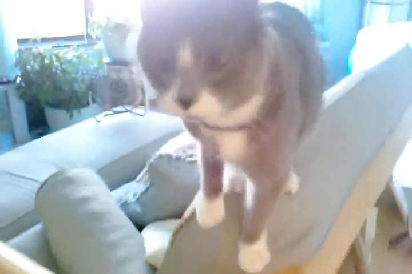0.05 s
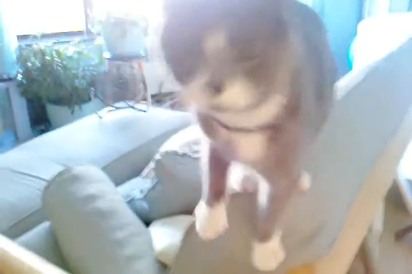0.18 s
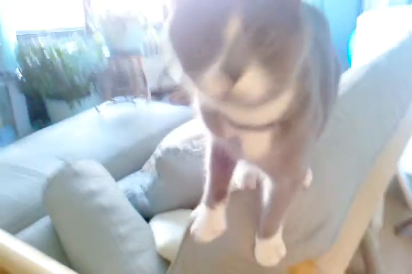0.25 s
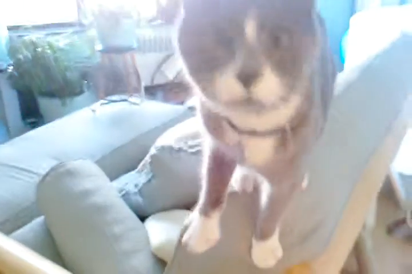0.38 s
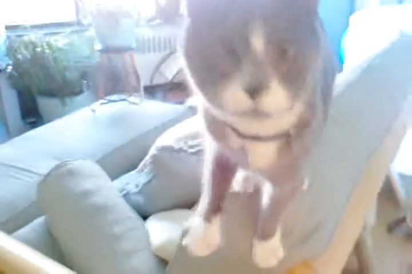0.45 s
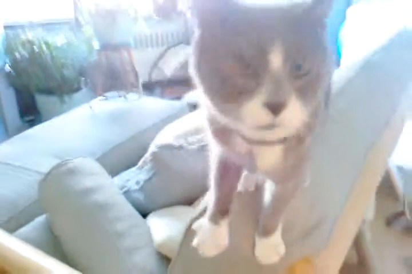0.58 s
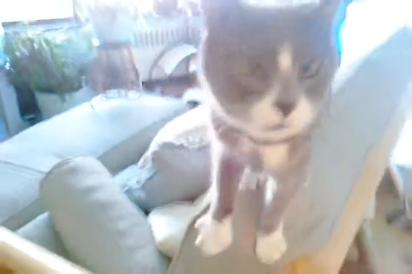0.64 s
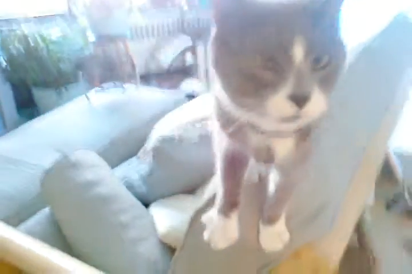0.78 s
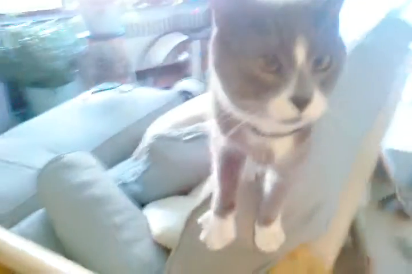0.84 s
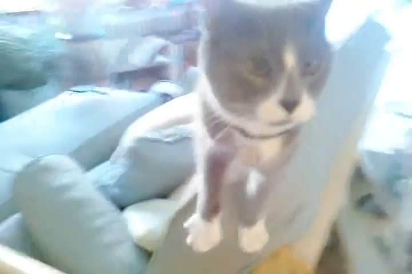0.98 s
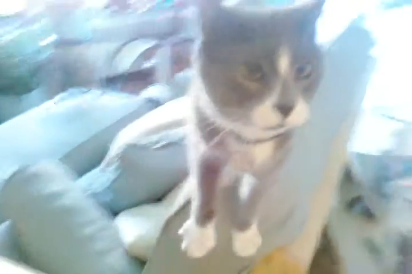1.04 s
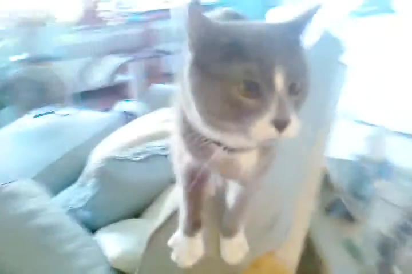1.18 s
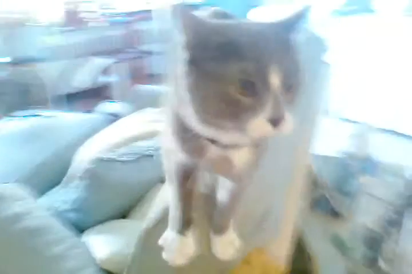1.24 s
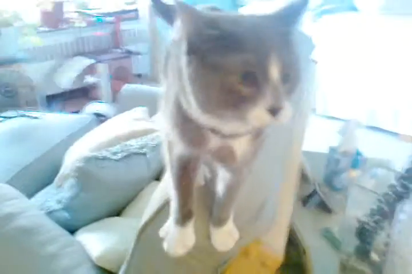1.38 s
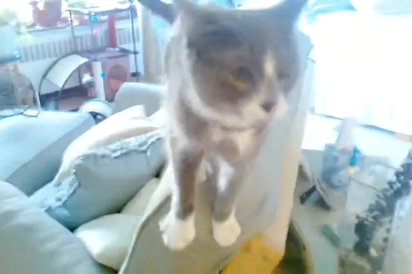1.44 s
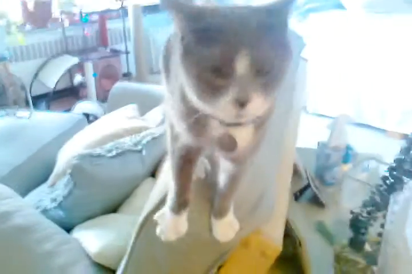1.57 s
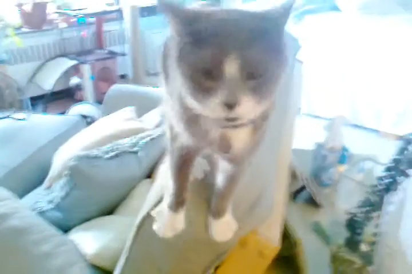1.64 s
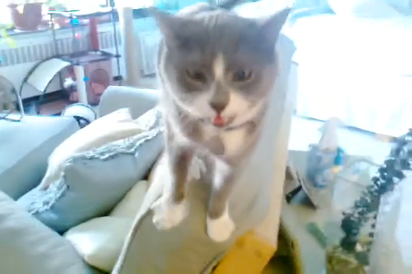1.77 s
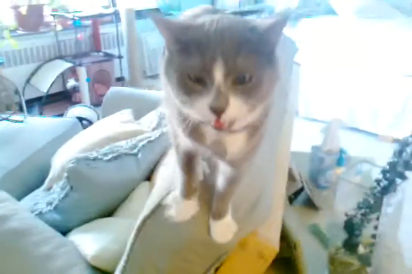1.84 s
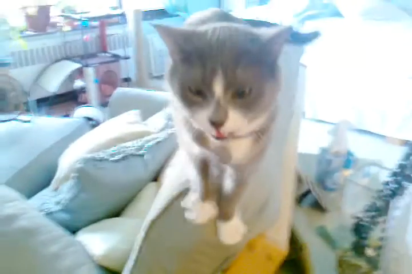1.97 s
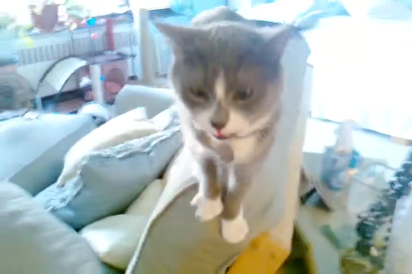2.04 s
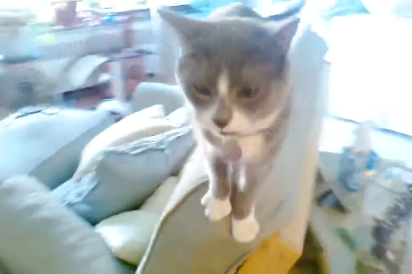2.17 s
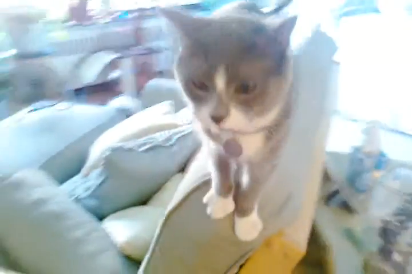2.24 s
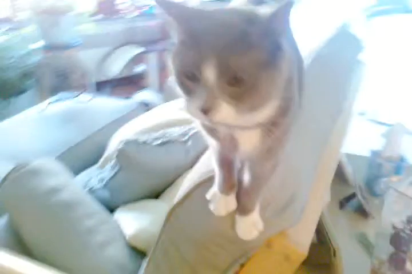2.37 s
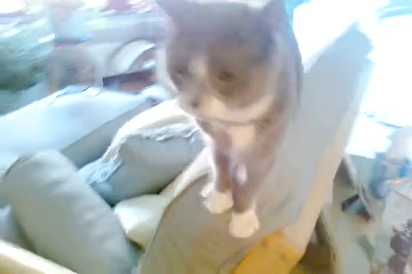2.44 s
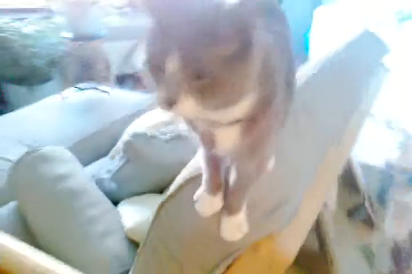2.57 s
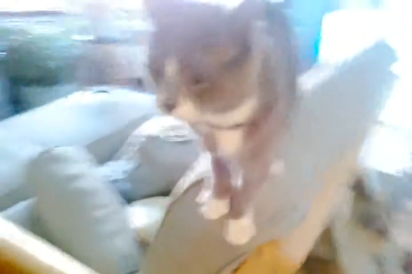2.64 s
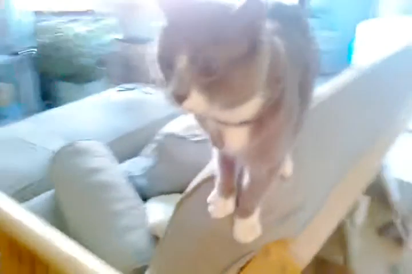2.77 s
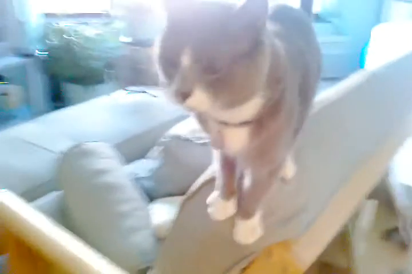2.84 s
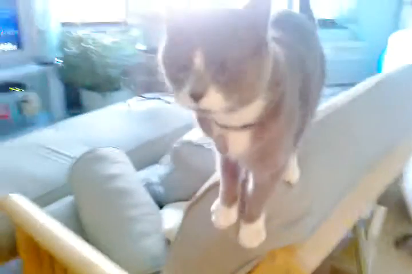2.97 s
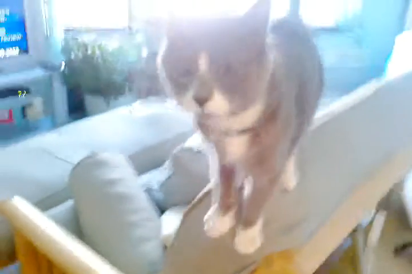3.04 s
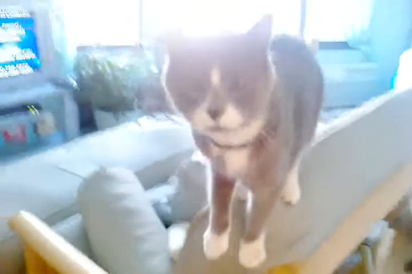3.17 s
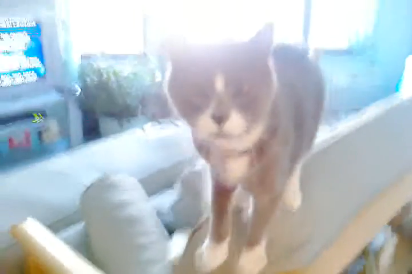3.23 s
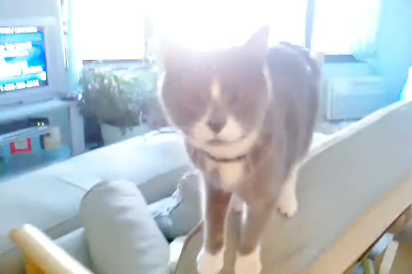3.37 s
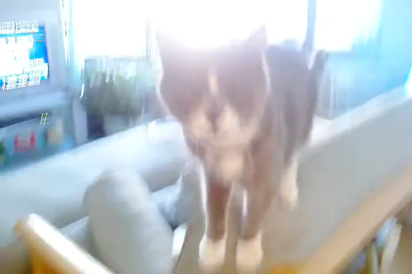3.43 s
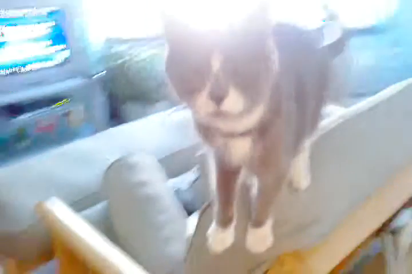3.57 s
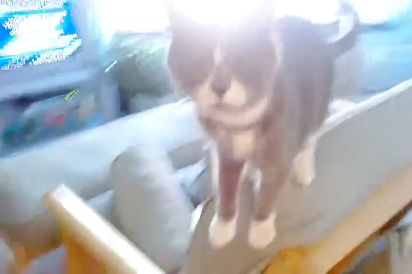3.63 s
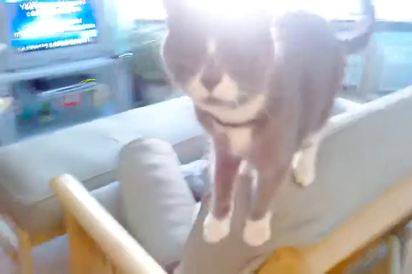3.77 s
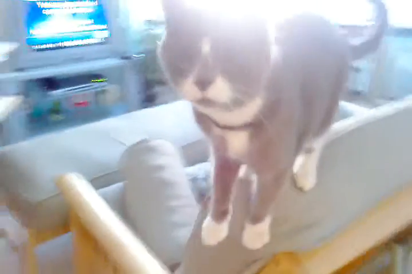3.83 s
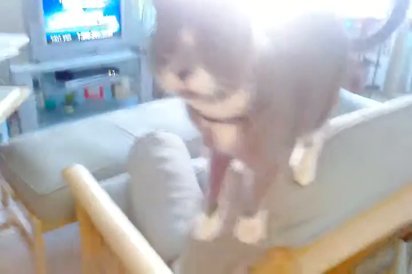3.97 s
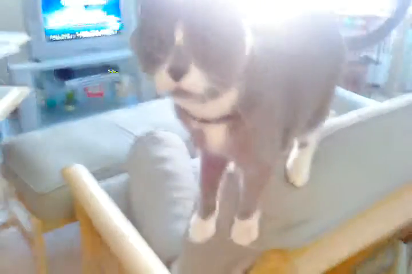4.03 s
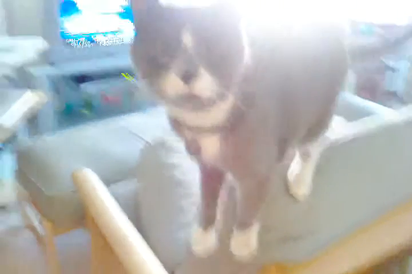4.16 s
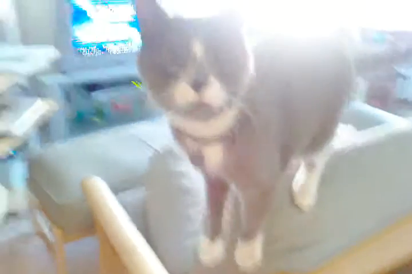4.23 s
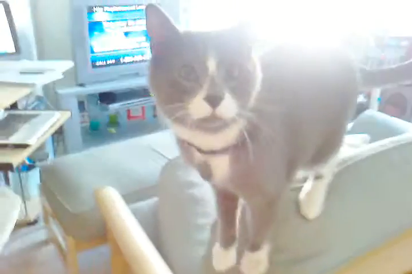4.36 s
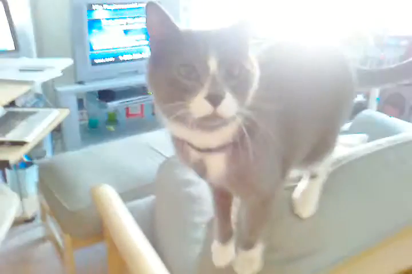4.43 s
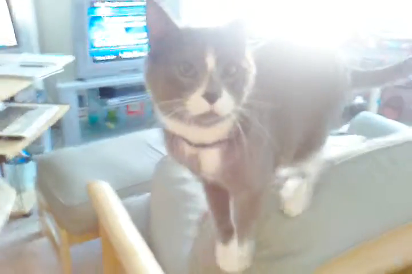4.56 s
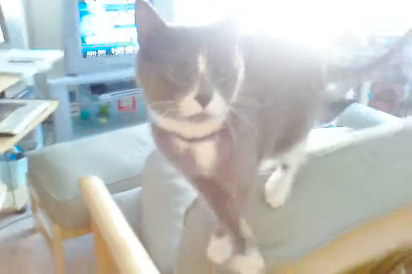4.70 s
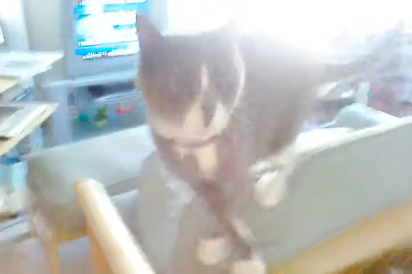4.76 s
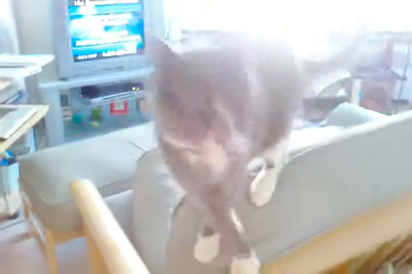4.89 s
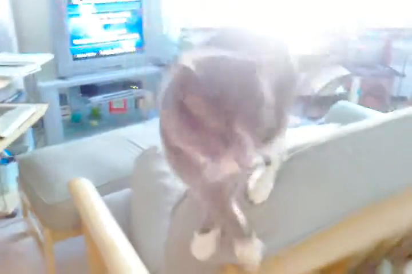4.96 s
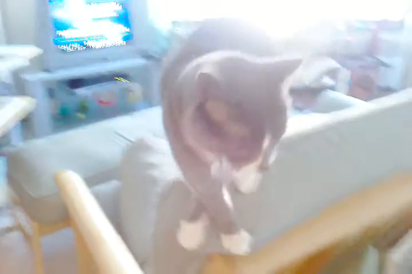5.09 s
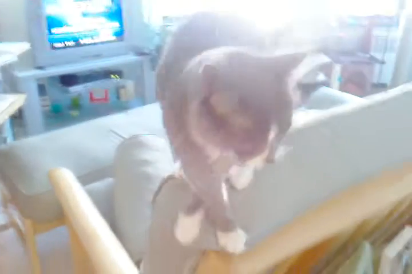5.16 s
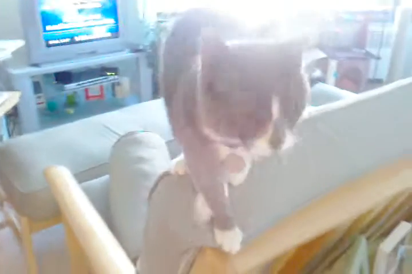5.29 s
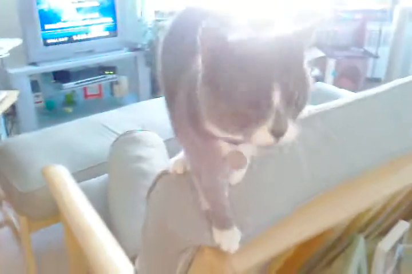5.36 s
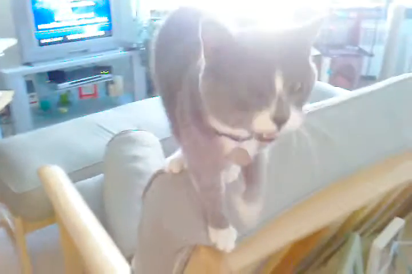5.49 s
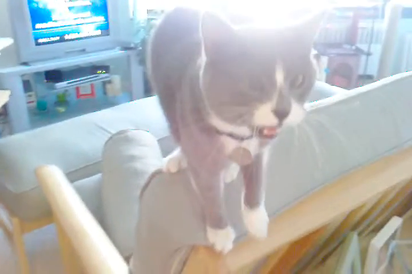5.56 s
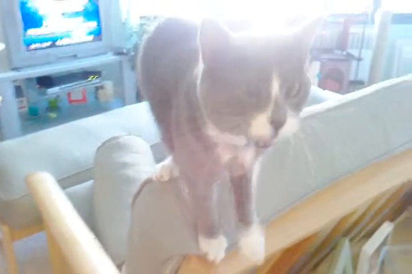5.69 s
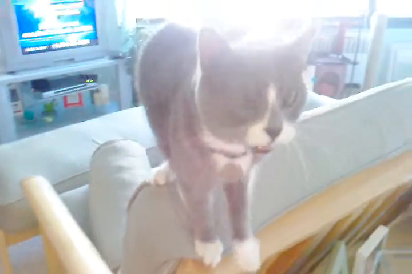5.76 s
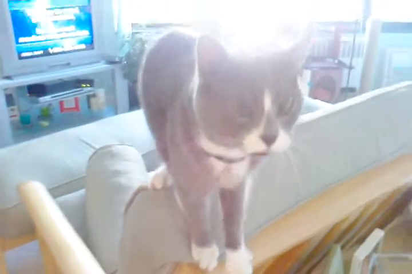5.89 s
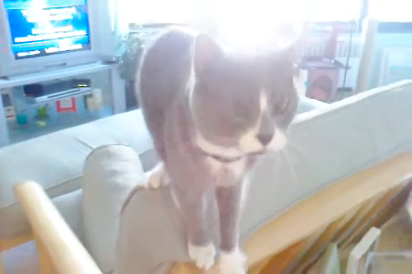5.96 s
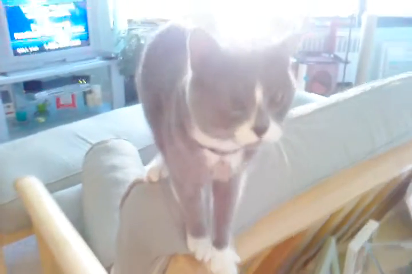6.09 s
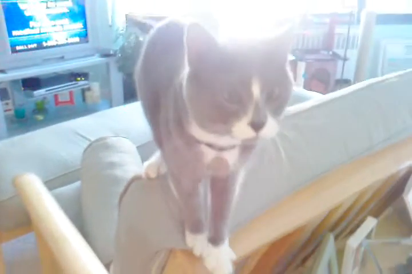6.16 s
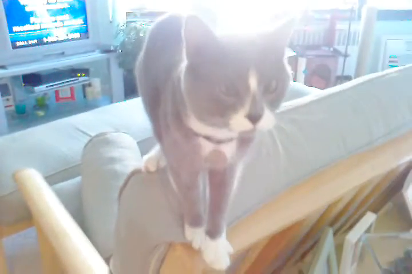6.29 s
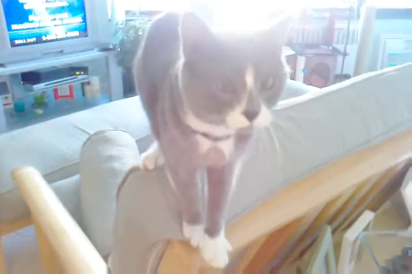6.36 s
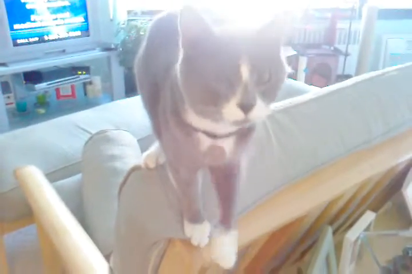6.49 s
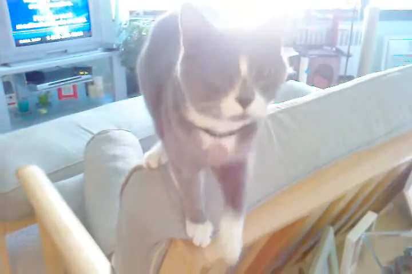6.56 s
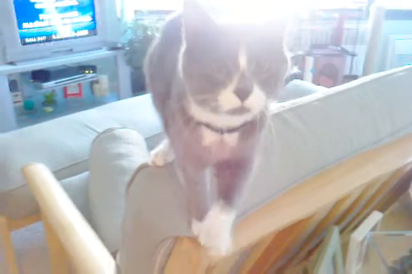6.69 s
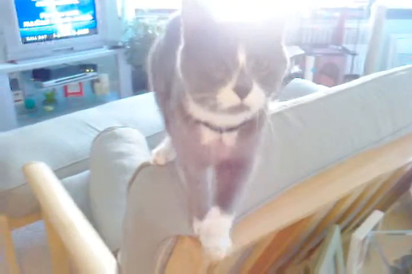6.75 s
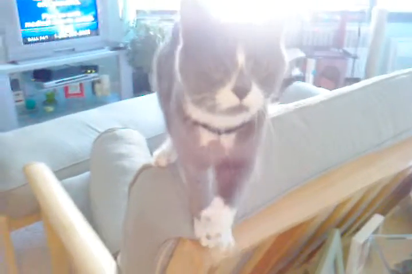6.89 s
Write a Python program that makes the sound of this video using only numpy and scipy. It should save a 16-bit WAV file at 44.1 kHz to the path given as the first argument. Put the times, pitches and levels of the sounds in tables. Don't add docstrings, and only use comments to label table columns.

```python
import sys
import numpy as np
from scipy import signal
from scipy.fft import rfft, irfft, next_fast_len
from scipy.io import wavfile
from scipy.ndimage import uniform_filter1d

SR = 44100
rng = np.random.default_rng(int(sys.argv[2]) if len(sys.argv) > 2 else 0)


def digitize_waveform(pressure):
    field = np.atleast_2d(pressure).T
    bounded = np.clip(field, -1, 1)
    quanta = np.round(bounded * 32767).astype(np.int16)
    wavfile.write(sys.argv[1], SR, quanta)


def ratio_of_db(decibels):
    return 10 ** (np.asarray(decibels, float) / 20)


N = 305172

# width_hz, level_db
MOUTH = [(1050, -4), (1370, -1.5), (900, -9)]
CAT_LAG_S = .00005


def meow(call, top_db, turn_db):
    span = slice(int(SHAPING[call][0][0] * SR), int(SHAPING[call][-1][0] * SR))
    pitch, first_db, second_db, low_hz, low_db, high_hz, high_db, rough, gate = (
        curve[span] for curve in articulate(call))
    rough = np.clip(rough, 0, 1)
    jitter = .002 * drift(25)[span] + .12 * rough ** 2 * drift(150)[span]
    pitch = uniform_filter1d(pitch, size=500) * (1 + jitter)
    cycles = np.cumsum(pitch) / SR
    centres_hz = (low_hz, high_hz, 4930)
    levels_db = (low_db, high_db, high_db + top_db)
    ports = np.zeros((2, N))
    for k in range(1, 13):
        if k == 1:
            level = ratio_of_db(first_db - 4.5)
        elif k == 2:
            level = ratio_of_db(second_db - 5.0)
        else:
            level = sum(ratio_of_db(db + open_db) / (1 + (2 * (k * pitch - hz) / width_hz) ** 2) ** 2
                        for (width_hz, db), hz, open_db in zip(MOUTH, centres_hz, levels_db))
        shimmer = ratio_of_db((0.46 + 0.21 * k) * drift(21)[span]) * (1 + rough * drift(110)[span])
        for side, sign in enumerate((1, -1)):
            wander_db = .7 * min(k, 4) * drift(2)[span]
            uneven = ratio_of_db(wander_db - sign * turn_db * (k > 2))
            phase = 2 * np.pi * k * (cycles + sign * pitch * CAT_LAG_S / 2) + 0.36 * k * k
            ports[side, span] += gate * level * shimmer * uneven * np.sin(phase)
    return np.sqrt(2) * ports


# time_s, pitch_hz
PITCH = [
    [(1.587, 641.5), (1.657, 606), (1.75, 689.5), (1.8, 717.7), (1.85, 728), (1.966, 705.3), (2.03, 682),
     (2.16, 656.5), (2.275, 625)],
    [(5.332, 559), (5.368, 530), (5.46, 637.4), (5.55, 705.7), (5.8, 721), (5.854, 693.5), (5.925, 712.5),
     (5.94, 737), (6.04, 715.5)],
]
# time_s, effort_db, jaw_open (0-1), lips_spread (0-1), upper_resonance_hz (tongue)
SHAPING = [
    [(1.588, -40, 0.3, 0.3, 3830), (1.657, -46.5, 0.52, .27, 3600), (1.715, -42.5, 0.18, 0.81, 3050),
     (1.79, -38.5, 0.67, 0.71, 3620), (1.86, -35.5, 0.57, 0.66, 4000), (1.965, -40.5, 0.58, 0.64, 3630),
     (1.995, -42, 0.4, 0.55, 3270), (2.08, -44.5, 0, 0.62, 3150), (2.275, -38.5, .2, 0.03, 3320)],
    [(5.332, -38.5, 0.24, 0.37, 4330), (5.357, -44.5, 0.9, 0.67, 4200), (5.41, -43, 0.78, 0.42, 4080),
     (5.5, -40, 0.53, 0.69, 3270), (5.65, -36, 0.86, 0.54, 3570), (5.72, -39.5, 0.72, 0.42, 3600),
     (5.91, -40, 0.38, 0, 4200), (5.95, -36.5, 0.17, 0.1, 4200), (6.038, -40.5, 0, .3, 3480)],
]
END_HZ, END_JAW, END_DB, END_ROUGH = [-68, 45], [0.33, -0.33], [-4.5, 3.5], [.2, .01]
END_FIRST_DB, END_LEAD_S, END_S = [-10, 2], [0.0208, 0.012], [0.0143, .007]
SECOND_DB, ONSET_SHUT_DB, RELEASE_S = [-9, -7.5], [-22, -6.5], [.015, 0.018]
FIRM_DB = -38


def articulate(call):
    (pitch,), (effort_db, jaw, lips, high_hz) = in_time(PITCH[call]), in_time(SHAPING[call])
    start_s, end_s = SHAPING[call][0][0], SHAPING[call][-1][0]
    ending = swell(end_s - END_LEAD_S[call], END_S[call])
    pitch = pitch + 140.6 * swell(start_s, 0.0072) + END_HZ[call] * ending
    rough = .08 + .02 * (FIRM_DB - effort_db) + END_ROUGH[call] * ending + .13 * swell(start_s, .06)
    effort_db = effort_db + END_DB[call] * ending
    jaw = jaw + END_JAW[call] * ending
    first_db = effort_db - 11.5 * jaw + END_FIRST_DB[call] * ending
    second_db = effort_db + SECOND_DB[call] + 0.5 * jaw - 0.08 * (effort_db - FIRM_DB)
    mouth_db = effort_db + ONSET_SHUT_DB[call] * swell(start_s, 0.021)
    low_hz = 3.15 * pitch
    low_db = mouth_db - 15 + 21.5 * jaw
    high_db = mouth_db - 33.5 + 38 * lips
    gate = inside(start_s, end_s + 1, 0.0031) * inside(start_s - 1, end_s, RELEASE_S[call])
    return pitch, first_db, second_db, low_hz, low_db, high_hz, high_db, rough, gate


def room(x):
    t = np.arange(int(SR / 2)) / SR
    t60_s = 0.39
    tails = low(rng.standard_normal((2, len(t))), 5300) * ratio_of_db(-60 * t / t60_s) * (t > .004)
    return np.array([signal.fftconvolve(x, tail / np.linalg.norm(tail))[:N] for tail in tails])


# time_s, push_db, ring_db, half_push_s, shell (index)
SNAPS = [
    (.006, -36, -60, .00007, 1),
    (3.52543, 1.5, -5, .0003, 0),
    (3.82200, -18, -34, .00013, 1),
    (3.82345, -21, -26, .00032, 1),
]
# mode_hz, level_db, t60_s
SHELLS = [
    [(409, -26, .04), (700, -12, .032), (991, -4.5, .02), (1430, -8, .015), (1960, -11, .015),
     (2500, -11, .012), (3500, -19, .01), (4500, -19, .008), (5800, -15, .007), (8300, -13, .006),
     (10000, -17, .005), (12800, -16, .005)],
    [(720, -4, .022), (1270, -1.5, .014), (1600, -10, .012), (1960, -4, .015), (2700, -14, .012),
     (3500, -12, .012), (4600, -14, .008), (6800, -16, .006), (10000, -18, .004)],
]


def snaps():
    out = np.zeros(N)
    t = np.arange(int(.08 * SR)) / SR
    for s, push_db, ring_db, half_s, shell in SNAPS:
        push = np.exp(-((t - half_s) / (0.34 * half_s)) ** 2)
        pull = np.exp(-((t - 2 * half_s) / (0.34 * half_s)) ** 2)
        wave = ratio_of_db(push_db) * (push - 0.74 * pull)
        for k, (hz, db, t60_s) in enumerate(SHELLS[shell]):
            delay_s = min(2 * half_s, half_s / 2 + 1 / hz)
            late = np.maximum(t - delay_s, 0)
            wave += (-1) ** k * ratio_of_db(db + ring_db - 60 * late / t60_s) * np.sin(2 * np.pi * hz * late)
        at = round((s - half_s) * SR)
        out[at:at + len(t)] += wave
    return out


# start_s, length_s, level_db, change_db (over the stroke), low_weight_db
RUBS = [
    (-.01, 0.076, -47.5, -26, -16),
    (3.197, 0.067, -30.5, -19.5, -3),
    (3.272, 0.075, -43.5, -2, -13),
    (3.34, 0.097, -50.5, -8, -15),
    (3.38, 0.048, -57.5, 13.5, -3),
    (3.45, 0.051, -64, 9, -6),
]
# frequency_hz, level_db (per Hz)
HOUSING = [(300, -3), (450, -4), (900, -7), (1400, -6), (2300, -14), (3500, -16.5), (5000, -15),
           (7500, -13.5), (10000, -15.5), (13500, -12)]


def rub(rows, bright_db):
    t = np.arange(N) / SR
    grain = rms_one(noise(HOUSING)) * ratio_of_db(1.8 * drift(250))
    dull = low(grain, 3300)
    bright = (ratio_of_db(bright_db) - 1) * (grain - low(grain, 9000))
    out = 0
    for s, length_s, db, change_db, weight_db in rows:
        stroke_db = db + 6.5 + change_db * np.clip((t - s) / length_s, 0, 1)
        level = ratio_of_db(stroke_db) * inside(s, s + length_s, 0.0095)
        out = out + level * (grain + (ratio_of_db(weight_db) - 1) * dull + bright)
    return out


# centre_s, level_db, half_width_s
RUSTLES = [(.05, -64, 0.09), (.53, -57.5, 0.23), (.87, -65.5, 0.021), (1.05, -60, 0.013), (1.9, -63, 0.39),
           (2.28, -61.5, 0.081), (2.92, -67, .04), (3.17, -68, .025), (4.11, -60.5, 0.092), (4.5, -64, .04),
           (4.86, -69, .03), (5.39, -64, 0.042), (5.7, -62, 0.26), (6.2, -60, 0.23), (6.601, -64, 0.021)]
# frequency_hz, level_db (per Hz)
CLOTH = [(200, -12), (500, 2.5), (900, 6), (1500, 0), (2500, -3), (4000, -6), (5500, -8), (7500, -5.5),
         (10000, -10), (13500, -11)]


def rustle():
    level = sum(ratio_of_db(db) * swell(s, half_s) for s, db, half_s in RUSTLES)
    return np.array([level * ratio_of_db(2.5 + 0.43 * drift(60)) * rms_one(noise(CLOTH)) for side in range(2)])


# frequency_hz, shared_db (per Hz), opposed_db (per Hz)
ROOM_TONE = [(45, -100, -104), (87, -93.5, -92.5), (123, -77.5, -88), (222, -73.5, -89.5), (421, -83, -94),
             (583, -89, -100), (783, -85.5, -92.5), (1110, -93, -99), (1950, -99, -99), (3670, -104, -103),
             (4730, -110, -111), (8900, -107, -107), (9900, -112, -112), (13600, -116, -116)]
# pitch_hz, width_hz, level_db, right_port_gain (signed)
HUMS = [(130, 8.3, -58, 0.85), (282.8, 6.9, -64.5, 0.62), (401.2, 2, -66.5, 0.38), (3570, 32, -90, -0.89)]
# centre_s, level_db, half_width_s
SWELLS = [
    (.4, 1.6, 0.91),
    (2.23, 2.5, 0.27),
    (3.4, 0.8, 0.19),
    (6.1, 2.5, 0.63),
]


def room_tone():
    shared, opposed = noise(ROOM_TONE, column=1), noise(ROOM_TONE, column=2)
    tone = np.array([shared + opposed, shared - opposed])
    for hz, width_hz, db, sign in HUMS:
        tone += ratio_of_db(db) * narrow(hz, width_hz) * [[1], [sign]]
    swell_db = sum(db * swell(s, half_s) for s, db, half_s in SWELLS)
    tone += (ratio_of_db(swell_db + 0.08 * drift(12.0)) - 1) * low(tone, 1580)
    whine_db = -68 + 5.5 * swell(0, 1.7)
    return tone + ratio_of_db(whine_db) * narrow(915, width_hz=10)


def rms_one(x):
    return x / np.sqrt(np.mean(x ** 2) + 1e-20)


def in_time(rows):
    s, *columns = np.transpose(rows)
    return [np.interp(np.arange(N) / SR, s, c) for c in columns]


def inside(start_s, end_s, fade_s):
    t = np.arange(N) / SR
    return np.clip(np.minimum(t - start_s, end_s - t) / fade_s, 0, 1)


def swell(s, half_s):
    return np.exp(-((np.arange(N) / SR - s) / half_s) ** 2)


def drift(rate):
    r = np.exp(-80 * np.pi * rate / SR)
    slow = signal.lfilter([1], [1, -2 * r, r * r], rng.standard_normal(N // 40 + 2002))[2000:]
    return np.interp(np.arange(N) / 40, np.arange(len(slow)), rms_one(slow))


def noise(spectrum, column=1):
    size = next_fast_len(N)
    hz = np.maximum(np.arange(size // 2 + 1) * SR / size, 10)
    table = np.array(spectrum)
    db = np.interp(np.log(hz), np.log(table[:, 0]), table[:, column])
    gain = ratio_of_db(db) * np.sqrt(SR / 2)
    return irfft(rfft(rng.standard_normal(size)) * gain, size)[:N]


def narrow(hz, width_hz):
    r = np.exp(-np.pi * width_hz / SR)
    w = 2 * np.pi * hz / SR
    return rms_one(signal.lfilter([1, 0, -1], [1, -2 * r * np.cos(w), r * r], rng.standard_normal(N)))


def low(x, hz):
    return signal.sosfilt(signal.butter(2, hz, fs=SR, output="sos"), x)


def scene():
    cat = meow(0, top_db=-25, turn_db=-4.4) + meow(1, top_db=-2.5, turn_db=4)
    rubbing = rub(RUBS[:1], bright_db=9) + rub(RUBS[1:], bright_db=-39.0)
    touch = signal.sosfilt(signal.butter(2, 200, "high", fs=SR, output="sos"), rubbing + snaps())
    touch = touch * [[1], [.03]]
    return cat + ratio_of_db(-17) * room(cat[0]) + touch + rustle() + room_tone()


def band_limit(x):
    return signal.sosfilt(signal.butter(12, 13900, fs=SR, output="sos"), x)


# frequency_hz, level_db (per Hz)
AMP_HISS = [(300, -112), (3000, -116), (6000, -110), (9000, -111), (13500, -115)]


def record(dry):
    lag = 15
    other_port = np.pad(dry, ((0, 0), (lag, 0)))[::-1, :N]
    wide = dry - 0.89 * other_port + [noise(AMP_HISS), noise(AMP_HISS)]
    peak_db = 20 * np.log10(np.abs(wide).max(axis=0) + 1e-9)
    over_db = 0.16 * np.maximum(peak_db + 21, 0)
    fall_db = 5 * np.arange(N) / SR
    duck_db = np.maximum.accumulate(over_db + fall_db) - fall_db
    duck_db = uniform_filter1d(duck_db, size=200, origin=99)
    return band_limit(np.clip(wide * ratio_of_db(-duck_db), -1, 1))


dry = scene()
out = record(dry)
digitize_waveform(out)
```